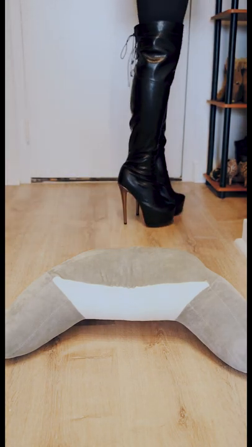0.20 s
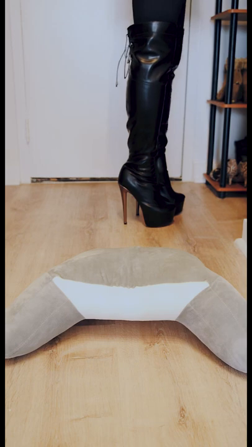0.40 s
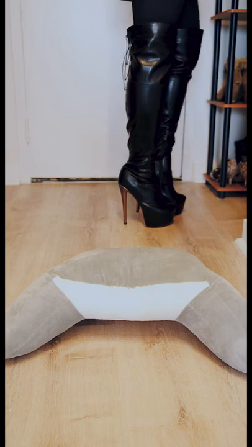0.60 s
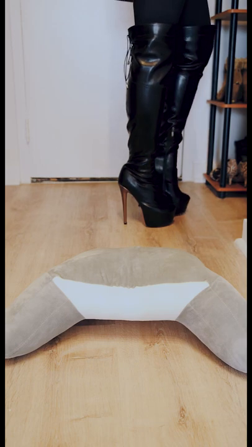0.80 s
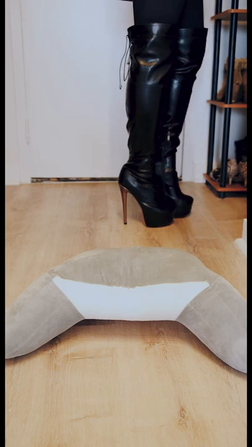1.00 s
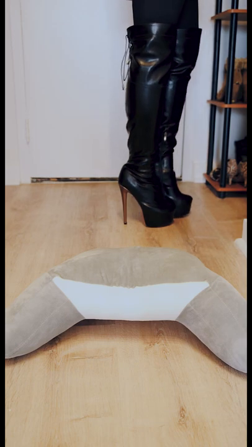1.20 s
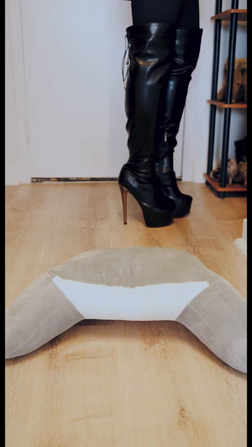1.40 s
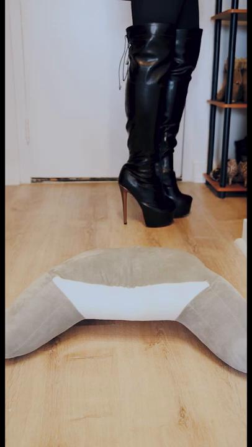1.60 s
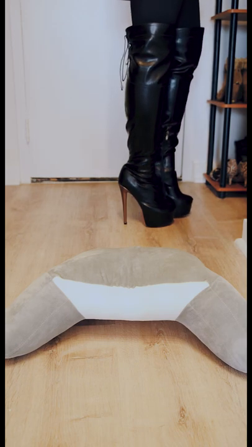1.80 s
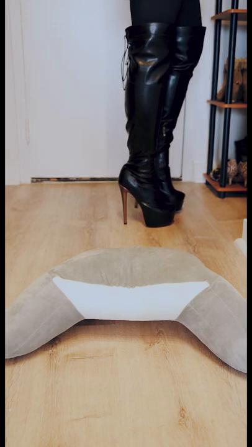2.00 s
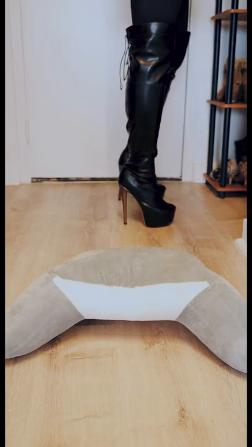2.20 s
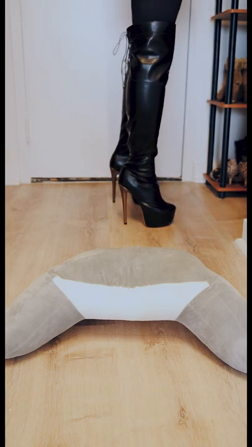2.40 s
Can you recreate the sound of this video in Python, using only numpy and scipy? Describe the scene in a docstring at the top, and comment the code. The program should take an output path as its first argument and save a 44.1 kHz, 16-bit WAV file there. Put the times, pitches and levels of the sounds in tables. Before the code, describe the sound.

Heeled platform boots on a laminate floor: one loud sharp knock, then softer, irregular steps with short gritty sole scrapes, in a small live room with faint low hum and rumble, close single-channel microphone.

```python
"""Small room with a laminate floor: hard heels and platform soles step slowly.
Each blow is a contact pulse shaped by filters, with a noisy crack, ringing boards, echoes, a diffuse
tail and a boom of the joists. Between blows, filtered grit grains make the scuffs of dragging soles,
and tiny metal tinkles are decaying sines. Behind lie shaped room noise, a swelling rumble of resonated
noise and a distant hum of two tones that glide mostly upward."""
import sys
import numpy as np
from scipy import signal
from scipy.fft import rfft, irfft
from scipy.io import wavfile
from scipy.ndimage import uniform_filter1d

SR = 44100
rng = np.random.default_rng(int(sys.argv[2]) if len(sys.argv) > 2 else 0)


def transcribe(signal):
    """Save signal, clipped to [-1, 1], as a 16-bit WAV file at the path in sys.argv[1]."""
    frames = np.atleast_2d(signal).T
    limited = np.clip(frames, -1, 1)
    pcm = np.round(limited * 32767).astype(np.int16)
    wavfile.write(sys.argv[1], SR, pcm)


def ratio(d):
    """dB to gain"""
    e = np.asarray(d, float) / 20
    return 10 ** e


N = 105840  # samples, 2.4 s


def unit_rms(x):
    """Normalisation: scales a signal to an rms of 1."""
    return x / np.sqrt(np.mean(x ** 2) + 1e-20)


def read(points, hz):
    """Interpolation of a table along a logarithmic frequency axis."""
    f, value = np.transpose(points)
    return np.interp(np.log(hz + 1), np.log(f + 1), value)


def causal(db):
    """Minimum phase: folding the cepstrum of a dB spectrum (2049 bins) gives a causal impulse response."""
    cepstrum = irfft(np.maximum(db, -100) * np.log(10) / 20)
    cepstrum[1:2048] *= 2
    cepstrum[2049:] = 0
    return irfft(np.exp(rfft(cepstrum)))


def resonate(x, hz, width):
    """Resonance: shifts hz down to zero, smooths with one pole, shifts back; hz may glide."""
    turn = np.exp(2j * np.pi * np.cumsum(hz * np.ones(len(x))) / SR)
    pole = np.exp(-np.pi * width / SR)
    smooth = signal.lfilter([1 - pole], [1, -pole], x / turn)
    return 2 * (turn * smooth).real


def rings(modes, t):
    """Modal superposition: a sum of exponentially decaying sines."""
    total = 0
    for hz, db, t60 in modes:
        total = total + ratio(db - 60 * t / max(t60, .01)) * np.sin(2 * np.pi * hz * t)
    return total


# Spectrum of the steady room noise: f/Hz, relative level/dB per Hz
AIR_SPECTRUM = [(12, -35), (25, 9.5), (36, 3), (52, 6), (75, -3.5), (107, -3.5), (167, 3), (192, -10),
                (250, -13.5), (365, -13), (554, -26), (713, -26.5), (1740, -37), (3400, -40.5), (5030, -46),
                (14500, -53), (15800, -54)]


def air():
    """Stationary noise: random spectra under a fixed envelope, with faint patches in time and frequency."""
    level_db, patchy_db = -40.5, 2
    frames, hz = N // 512 + 5, np.fft.rfftfreq(2048, 1 / SR)
    real, imaginary, patches = rng.standard_normal((frames, 1025, 3)).T
    patches = uniform_filter1d(patches, 20, 0)  # across frequency
    patches = unit_rms(uniform_filter1d(patches, 8, 1))  # across time
    spectra = (real + 1j * imaginary) * ratio(read(AIR_SPECTRUM, hz)[:, None] + patchy_db * patches)
    noise = signal.istft(spectra, nperseg=2048, noverlap=1536)[1][:N]
    return ratio(level_db) * unit_rms(noise)


# Swells of the deepest rumble: t/s, level/dB
RUMBLE_LEVEL = [(0, -71), (.22, -49), (.6, -49.5), (.95, -54.5), (1.14, -36.5), (1.5, -42.5), (1.8, -50.5),
                (2.08, -31.5), (2.4, -57.5)]


def rumble():
    """Narrow-band noise: two equal resonances in cascade, with a slowly varying level."""
    centre_hz, width_hz = 21, 12  # width of each resonance
    deep = resonate(rng.standard_normal(N), centre_hz, width_hz)
    deep = resonate(deep, centre_hz, width_hz)
    s, db = np.transpose(RUMBLE_LEVEL)
    return ratio(np.interp(np.arange(N) / SR, s, db)) * unit_rms(deep)


# Course of the hum, levels before the mix of tone and fuzz: t/s, f/Hz, lower level/dB, upper level/dB
HUM_COURSE = [(0, 163.6, -42, -45.5), (.3, 162.5, -42, -48.5), (.55, 166.9, -35, -43.5),
              (.75, 165.6, -53, -53.5), (0.951, 169, -39.5, -45.5), (1.2, 173.6, -38, -53.5),
              (1.452, 176.8, -37, -39.5), (1.702, 182.5, -42, -43.5), (1.849, 187.6, -50, -51.5),
              (2.15, 175.6, -65.5, -55), (2.4, 177, -35.5, -50.5)]


def hum():
    """Frequency modulation: phase integrates a gliding pitch; narrow noise roughens each of two tones."""
    upper_ratio, width_hz, fuzz_share = 1.22, 3.47, 0.21
    s, *columns = np.transpose(HUM_COURSE)
    hz, db, upper_db = (np.interp(np.arange(N) / SR, s, c) for c in columns)
    out = 0
    for f, level_db in ((hz, db), (upper_ratio * hz, upper_db)):
        tone = np.sqrt(2) * np.sin(2 * np.pi * (np.cumsum(f) / SR + rng.random()))
        fuzz = unit_rms(resonate(rng.standard_normal(N), f, width_hz))
        out = out + ratio(level_db) * ((1 - fuzz_share) * tone + fuzz_share * fuzz)
    return out


# Tiny metal tinkles on the boot: t/s, peak level/dB, f/Hz
TINKLE_EVENTS = [(1.139, -55.5, 9420), (1.1514, -65, 9770), (1.1712, -64, 10000), (1.1857, -61, 9696)]


def tinkles():
    """Free vibration of small metal parts: very short, high decaying sines."""
    t60 = 0.016  # s
    out, t = np.zeros(N), np.arange(2000) / SR
    for s, db, hz in TINKLE_EVENTS:
        out[round(s * SR):][:2000] += rings([(hz, db, t60)], t)
    return out


# Decay of the late room sound: f/Hz, t60/s
ROOM_DECAY = [(100, 0.47), (420, 0.43), (1100, 0.43), (2900, 0.36), (7700, 0.61), (15000, 0.62)]


def room():
    """Diffuse reverberation: noise whose bands decay at their own rates, strong early; energy 1."""
    start_s, early_db, early_t60 = .002, 9, .08  # early_t60 in s, on top of the band decay
    hz, t, z = signal.stft(rng.standard_normal(SR // 2), SR, nperseg=128)
    decay = ratio(-60 * t / read(ROOM_DECAY, hz)[:, None])
    tail = signal.istft(z * decay, SR, nperseg=128)[1]
    t = np.arange(len(tail)) / SR
    tail *= np.clip(t / start_s - 1, 0, 1)  # silent until start_s, full at twice that
    tail *= 1 + ratio(early_db - 60 * t / early_t60)
    return tail / np.linalg.norm(tail)


# Scrapes of a dragging sole: start t/s, level/dB, rise/s, t60/s, initial treble level/dB
SCRAPES = [(0.505, -52.5, 0.011, 0.27, 3.5), (0.552, -75.5, 0.0014, 0.29, 18),
           (0.606, -60, 0.002, 0.18, 9.5), (0.622, -55, 0.0084, 0.3, 8.5), (0.646, -51, 0.015, 0.17, 10.5),
           (0.683, -46, 0.0037, 0.14, -6), (.71, -66.5, 0.0073, 0.39, 20), (1.105, -44.5, 0.009, 0.19, -4),
           (1.8697, -45.5, 0.0018, 0.086, 3.5), (1.881, -58, 0.0024, 0.11, 9),
           (1.9, -51.5, 0.0033, 0.047, 5), (1.9108, -49, 0.0014, 0.18, 5.5), (2.15, -65, 0.058, 0.66, 2),
           (2.27, -66.5, 0.057, 0.77, 3), (2.37, -63, 0.012, 0.27, 0)]
# Spectrum of the grit: f/Hz, relative level/dB per Hz
GRIT_SPECTRUM = [(350, -27), (700, -5), (1290, 0), (1700, 0.5), (2300, -4.5), (3500, -3.5), (4700, -13),
                 (6300, -11.5), (9000, -17.5), (15500, -28.5)]


def scuffs():
    """Friction as shot noise: dense filtered grit grains; each scrape swells and fades, treble first."""
    grains_per_s, spread_db = 9000, 2
    treble_hz, treble_fade = 7100, 114  # treble_fade in dB/s, on top of the scrape's own decay
    room_db = -6.5
    t, hz = np.arange(N) / SR, np.fft.rfftfreq(4096, 1 / SR)
    grains = rng.standard_normal(N) * ratio(spread_db * np.minimum(rng.exponential(1, N), 4))
    grains *= rng.random(N) < grains_per_s / SR
    grit = unit_rms(signal.fftconvolve(grains, causal(read(GRIT_SPECTRUM, hz)))[:N])
    dull = signal.sosfilt(signal.butter(2, treble_hz, fs=SR, output="sos"), grit)
    treble = grit - dull
    dry = np.zeros(N)
    for s, db, rise, t60, treble_db in SCRAPES:
        fading_s = np.maximum(t - s - rise, 0)
        shape = np.clip((t - s) / rise, 0, 1) * ratio(db - 60 * fading_s / t60)
        dry += shape * (dull + ratio(treble_db - treble_fade * fading_s) * treble)
    return dry + ratio(room_db) * signal.fftconvolve(dry, room())[:N]


# Modes of the joists: f/Hz, level/dB, t60/s
JOIST_MODES = [(73.25, 7, 0.86), (84.4, -10, 0.44), (128, -1, 0.15), (167, -23, 0.11)]


def joist_boom(t):
    """Low structural modes: decaying sines whose motion builds up gradually."""
    rise_s = 0.023
    return rings(JOIST_MODES, t) * (1 - np.exp(-t / rise_s))


# Modes of the boards: f/Hz, relative level/dB, t60/s before shortening
BOARD_MODES = [(405, 15.5, 0.43), (533, 1, 0.052), (583, 60, 0.05), (688, 41.5, 0.089), (938, -44, 0.6),
               (890, -3, 0.45), (963, -27.5, 0.34), (1244, -29, 0.23), (1455, -14, 0.36),
               (1580, -93, 0.069)]


def board_ring(t):
    """Plate modes: decaying sines with shortened decays, scaled to peak 1."""
    decay_share = .45
    ring = rings([(hz, db, decay_share * t60) for hz, db, t60 in BOARD_MODES], t)
    return ring / abs(ring).max()


# First echoes: delay t/s, gain
FIRST_ECHOES = [(.0022, .8), (.0045, -.7), (.0106, .55), (.0124, 1.1), (.0168, -.55), (.025, .45),
                (.0297, .45)]


def first_echoes(db):
    """Discrete reflections: delayed copies of the blow; a blow above the threshold also bounces."""
    bounce_s, bounce_gain, threshold_db = .00072, 2.7, -16
    echoes = np.zeros(2000)
    echoes[0] = 1
    for delay, gain in FIRST_ECHOES:
        echoes[round(delay * SR)] = gain
    echoes[round(bounce_s * SR)] = bounce_gain * (db > threshold_db)
    return echoes


# Dull body of a blow: f/Hz, relative level/dB per Hz
BODY_SPECTRUM = [(60, -21.5), (100, -5), (313, -4.5), (576, -8), (1000, -3), (1490, -6), (2200, -11.5),
                 (3500, -8.5), (5000, -48), (15500, -89)]


def thump(contact, knock_hz, knock_db, t, hz):
    """Impact excitation: a rounded contact pulse drives the body filter with a knock peak; peak 1."""
    width = 0.54  # octaves
    push = np.sin(np.pi * np.clip(t[:100] / contact, 0, 1)) ** 2
    knock = knock_db * np.exp(-(np.log2((hz + 1) / knock_hz) / width) ** 2)
    body = np.convolve(push, causal(read(BODY_SPECTRUM, hz) + knock))
    return body / abs(body).max()


# Sharp edge of a blow: f/Hz, relative level/dB per Hz
CRACK_SPECTRUM = [(500, -26), (1500, -11.5), (3600, -7.5), (4750, -17), (6660, -18), (9000, -23.5),
                  (15500, -57)]


def crack(crack_db, crack_hz, t, hz):
    """Broadband transient: filtered noise with a rise and decay; also returns its impulse response."""
    peak_db, width = 9, .3  # width in octaves
    rise_s, t60 = 0.0024, 0.027  # s
    peak = peak_db * np.exp(-(np.log2((hz + 1) / crack_hz) / width) ** 2)
    response = causal(read(CRACK_SPECTRUM, hz) + peak)
    noise = unit_rms(signal.fftconvolve(rng.standard_normal(10000), response)[4000:10000])
    envelope = ratio(crack_db - 60 * t / t60) * np.minimum(t / rise_s, 1)
    return envelope * noise, unit_rms(response)


# Blows: t/s, level/dB, contact/s, knock f/Hz, knock level/dB, crack level/dB, crack f/Hz, boom level/dB
# (crack and boom relative to the blow)
BLOW_EVENTS = [(0.2014, -11.5, 0.00062, 607, 6.5, -11, 2440, -20.5),
               (0.5713, -31.5, 0.00088, 346, 5, -12, 1874, -15.5),
               (1.0334, -35.5, 0.00052, 1230, 6, -2.5, 3200, -2),
               (1.1034, -24, .0011, 341.8, 5.5, -12, 2420, -11.5),
               (1.785, -37, 0.00044, 953, 11.5, -2.5, 2520, -20),
               (1.7963, -39.5, 0.0005, 986, -7.5, -17, 2600, -11)]


def blows():
    """Impact and response: each step sums thump, ringing boards, crack, room and joist boom."""
    boards_db, thump_room_db, crack_room_db = -5.5, 7, -18
    out, hz, t = np.zeros(N + SR), np.fft.rfftfreq(4096, 1 / SR), np.arange(SR) / SR
    short_t = t[:6000]
    ring, boom = board_ring(short_t), joist_boom(t)
    for s, db, contact, knock_hz, knock_db, crack_db, crack_hz, boom_db in BLOW_EVENTS:
        body = thump(contact, knock_hz, knock_db, t, hz)
        edge, edge_response = crack(crack_db, crack_hz, short_t, hz)
        direct = signal.fftconvolve(body, first_echoes(db))[:6000]
        direct += ratio(boards_db) * ring + edge
        feed = ratio(thump_room_db) * body[:4096] + ratio(crack_db + crack_room_db) * edge_response
        sound = signal.fftconvolve(feed, room())
        sound[:len(direct)] += direct
        at = round(s * SR)
        out[at:at + len(sound)] += ratio(db) * sound
        out[at:at + SR] += ratio(db + boom_db) * boom
    return out[:N]


def scene():
    """Linear superposition of all sources in one channel."""
    return (air() + rumble() + hum() + tinkles() + scuffs() + blows())[None]


def roll_off(x):
    """The treble ends steeply here."""
    return signal.sosfilt(signal.butter(12, 16160, fs=SR, output="sos"), x)


def record(dry):
    """Signal chain: the finished mix passes straight to the last stage."""
    return roll_off(dry)


dry = scene()
out = record(dry)
transcribe(out)
```